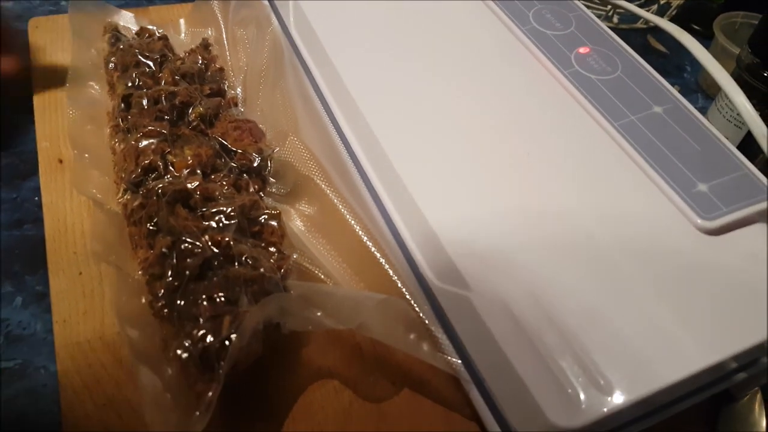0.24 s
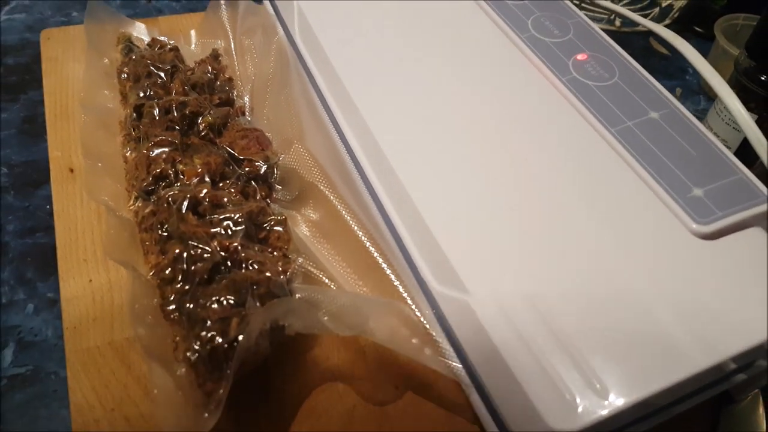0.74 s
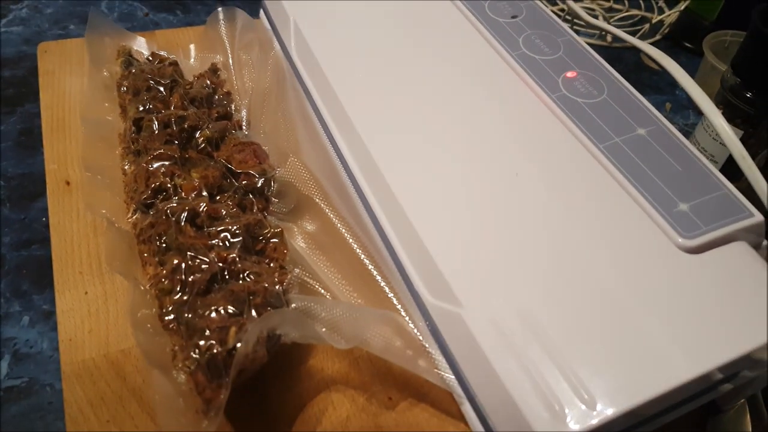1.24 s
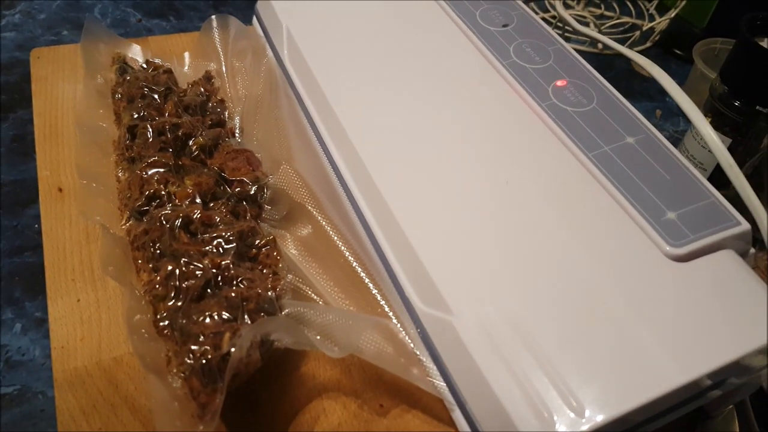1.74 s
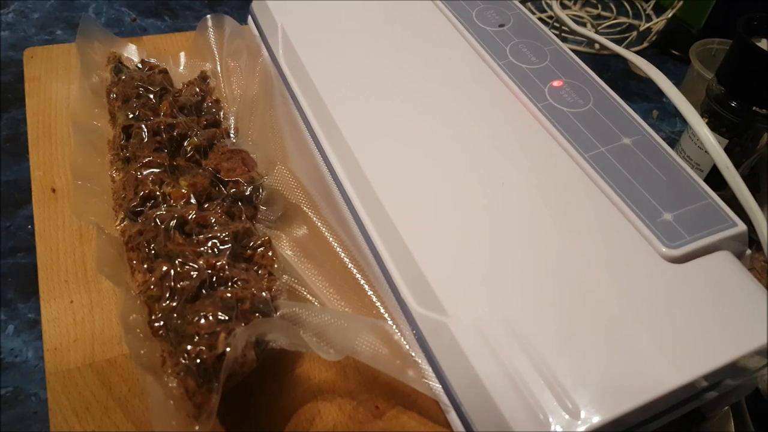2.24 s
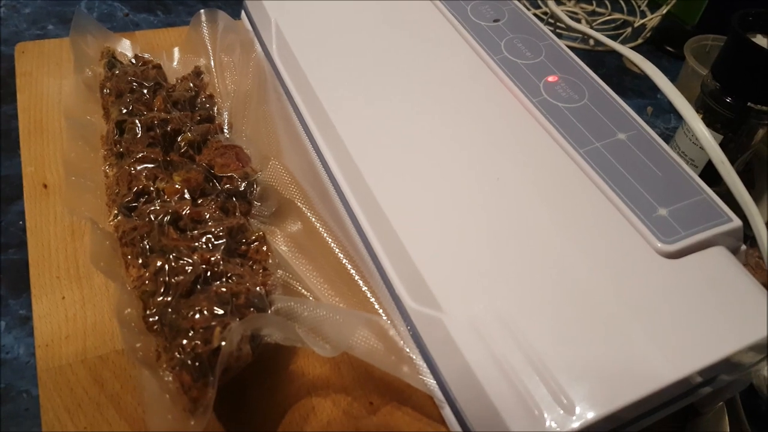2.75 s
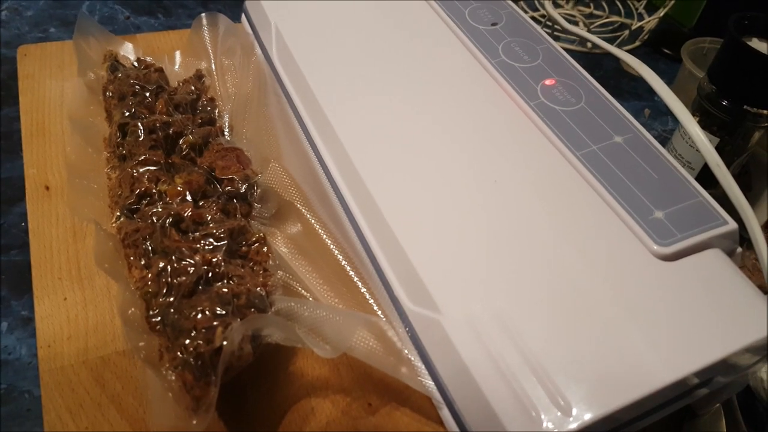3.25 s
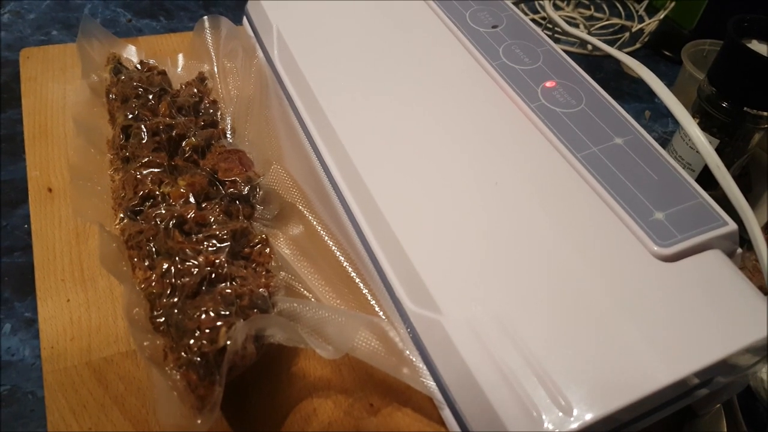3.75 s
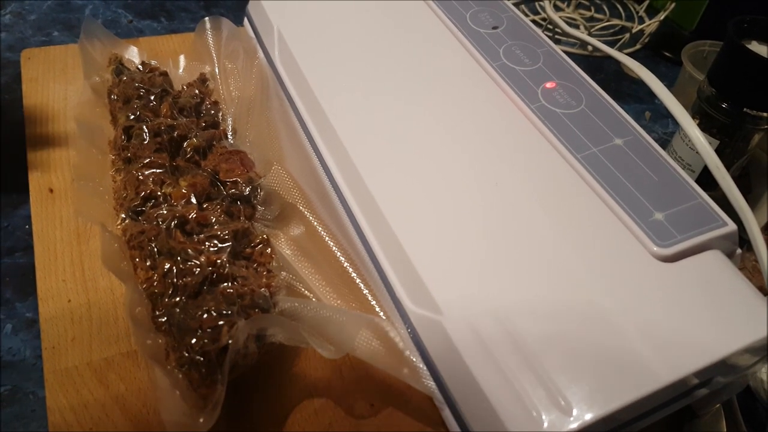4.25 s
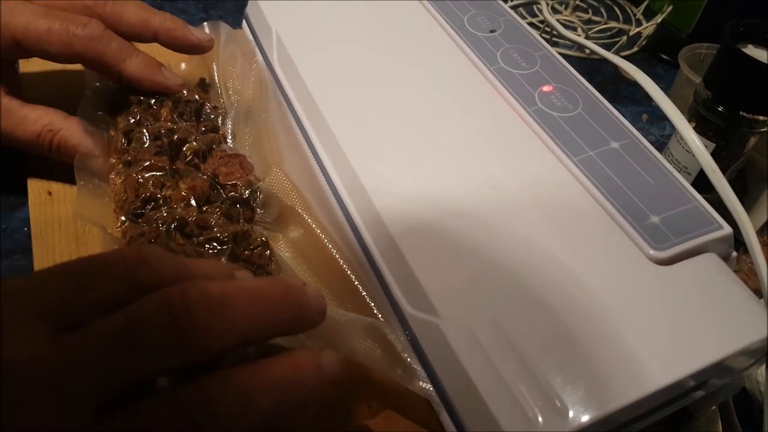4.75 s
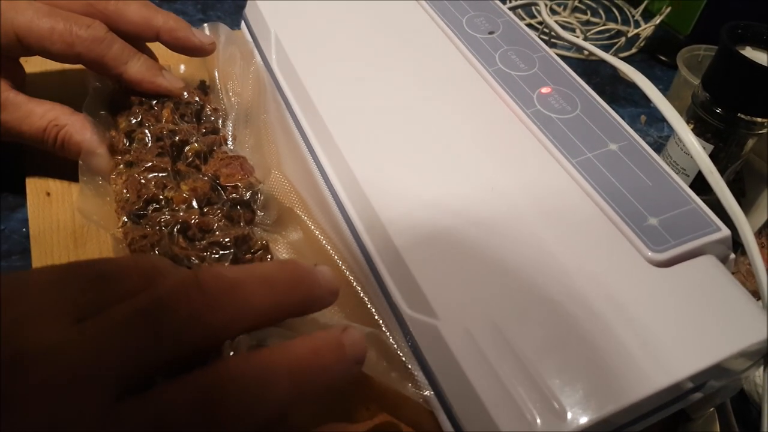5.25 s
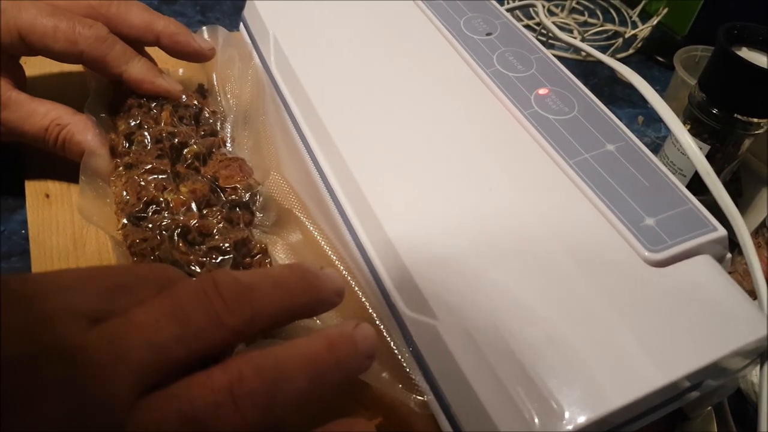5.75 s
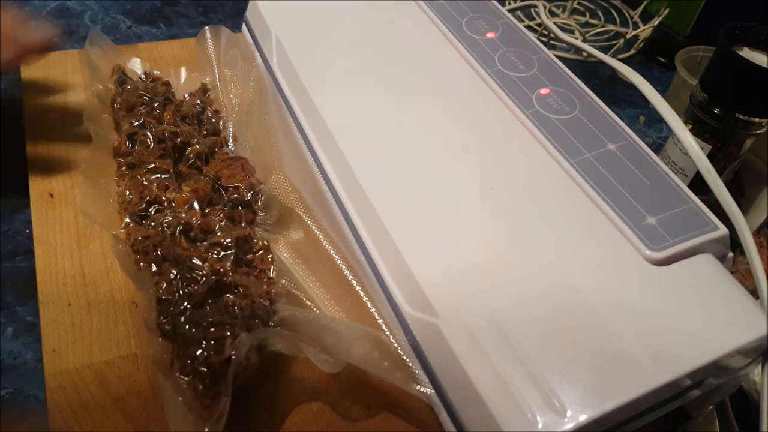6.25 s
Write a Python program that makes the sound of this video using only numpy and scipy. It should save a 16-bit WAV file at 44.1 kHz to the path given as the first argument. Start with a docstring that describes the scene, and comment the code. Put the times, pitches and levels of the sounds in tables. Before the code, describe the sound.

Close kitchen vacuum sealer pump buzzes hard and steadily, with hissing air, while a tightening plastic bag crackles, snaps and pops.

```python
"""A small piston pump in a kitchen vacuum sealer, close to two microphones, draws the air from a bag of food.
It turns about 42 times a second, slightly faster as the air thins; five blows a turn ring its casing.
A puff of hiss leaves the outlet each turn, over low crank tones and a steady rush of noise.
Ticks, snaps and pops are short noise bursts of the tightening film and pushes of its buckling creases.
Short reflections from the counter widen the pump; a small room gives the bag a brief tail."""
import sys
import numpy as np
from scipy import signal
from scipy.fft import rfft, irfft, next_fast_len
from scipy.io import wavfile
from scipy.ndimage import uniform_filter1d

SR = 44100
rng = np.random.default_rng(int(sys.argv[2]) if len(sys.argv) > 2 else 0)


def store_pcm(level_fs):
    """Save levels as 16-bit WAV."""
    pcm = np.round(np.clip(level_fs, -1, 1) * 32767).astype(np.int16)
    wavfile.write(sys.argv[1], SR, np.atleast_2d(pcm).T)


N = 286209
T = np.arange(N) / SR

# Speed of the pump shaft: time_s, turns_per_s
SHAFT_SPEED = [(0.0, 41.418), (0.5, 41.285), (1.1, 41.406), (1.5, 41.176), (2.0, 41.286), (2.5, 41.663),
               (3.4, 42.079), (4.2, 42.219), (5.0, 42.49), (6.0, 42.873), (6.49, 42.837)]
# Five blows, one row each: intake gulp, piston thump, valve opening, valve rebound, valve closing.
# Columns: open_place_turns, full_vacuum_place_turns, shift_power (exponent on vacuum),
# open_level_db, full_vacuum_level_db, halfway_extra_db, force_power (exponent on vacuum)
PUMP_BLOWS = [(0.007, -0.051, 0.96, 1.7, -10.3, 6.0, 0.74), (0.189, 0.172, 0.7, 20.9, 21.5, 0.7, 0.74),
              (0.211, 0.146, 0.91, -5.1, -0.2, -14.0, 0.86), (0.266, 0.256, 0.48, -4.4, -0.4, 11.3, 0.94),
              (0.331, 0.291, 0.63, 1.3, -1.0, -0.2, 0.41)]
# Colour of each blow before the casing: frequency_hz, gulp_db, thump_db, opening_db, rebound_db, closing_db
BLOW_COLOUR = [(40.0, -68.0, -64.0, -58.0, -65.0, -68.0), (150.0, -41.0, 1.0, -20.0, -23.0, -48.0),
               (280.0, -36.0, -32.0, 5.0, -15.0, 3.0), (450.0, -2.0, -11.0, -2.0, 0.0, 4.0),
               (650.0, -1.0, -22.0, -2.0, -13.0, -19.0), (950.0, -9.0, -15.0, -8.0, -6.0, 6.0),
               (1400.0, -16.0, -42.0, -9.0, -12.0, -12.0), (2000.0, -18.0, -22.0, 1.0, -2.0, -25.0),
               (2700.0, -32.0, -36.0, -26.0, -33.0, -37.0), (4000.0, -40.0, -58.0, -42.0, -42.0, -42.0),
               (9000.0, -66.0, -80.0, -64.0, -64.0, -66.0)]
# Resonances of casing and pump chamber: pitch_hz, width_hz, open_air_boost_db, full_vacuum_boost_db
CASING_RESONANCES = [(190, 15, 19.8, 18), (337.0, 14.0, 18.3, 14.1), (410.0, 14.0, 3.0, 8.8),
                     (457.0, 14.0, 14.0, 7.4), (497.0, 14.0, 10.5, 6.9), (565.0, 44.0, 0.3, 21.6),
                     (669.0, 16.0, 8.2, 12.7), (720.0, 20.0, 12.0, 17.9), (758.0, 14.0, 17.1, 5.8),
                     (884.0, 27.0, 8.6, 1.7), (1044.0, 14.0, 10.7, 1.8), (1141.0, 16.0, 11.8, 10.3),
                     (1265.0, 41.0, 9.3, 14.4), (1356.0, 29.0, 9.5, 15.0), (1440.0, 35.0, 16.4, 8.1),
                     (1588.0, 51.0, 7.0, 2.9), (1729.0, 53.0, 4.1, 7.5), (1953, 32, 9.7, 11),
                     (2101, 26, 8, 7.5), (2269, 80, 8.5, 10), (3050, 160, 4, 7)]
# Bands that swell into a whine (above 0 dB) or hollow out (below) as the pressure falls:
# height_s, half_length_s, pitch_hz, glide_hz_per_s, width_hz, boost_db
PRESSURE_SWELLS = [(0.19, 0.67, 253.0, -4.0, 46.0, -9.4), (0.92, 0.41, 1356.0, 207.0, 97.0, 10.7),
                   (1.13, 0.63, 587.0, 35.0, 47.0, 9.6), (1.14, 0.8, 1109.0, 3.0, 20.0, 10.5),
                   (1.63, 0.49, 454.0, -2.0, 24.0, -11.9), (1.66, 0.47, 1597.0, 4.0, 100.0, 5.4),
                   (2.11, 0.35, 2093.0, -29.0, 57.0, 7.4), (2.18, 0.55, 782.0, 43.0, 22.0, 7.0),
                   (2.32, 0.57, 2482.0, 4.0, 136.0, 9.4), (2.69, 0.37, 1663.0, -5.0, 235.0, -13.1),
                   (2.7, 0.51, 1341.0, -97.0, 70.0, 6.7), (3.52, 0.72, 1163.0, -43.0, 101.0, -14.6),
                   (4.26, 0.51, 1452.0, 6.0, 96.0, -7.6), (5.88, 0.94, 604.0, -9.0, 44.0, -14.2)]
# Shaking of the unbalanced crank: multiple_of_shaft_speed, start_level_db, end_level_db (peak, before the pump's gain)
CRANK_SHAKE = [(1.0, -60.3, -55.1), (2.0, -47.1, -36.9), (3.0, -26.5, -46.6), (4.0, -33.4, -28.4),
               (6.0, -49.4, -38.0), (7.0, -47.5, -31.2)]
# Level of the air jet at the outlet: time_s, level_db (rms)
OUTLET_LEVEL = [(0, -38.5), (2, -38), (3.5, -39.5), (4.5, -38.5), (6.49, -38)]
# Relative colour of the air jet: frequency_hz, density_db (per Hz)
OUTLET_COLOUR = [(300, -17), (1200, -4.5), (2200, 0.5), (3000, -2.5), (3700, -14), (4400, -12.5),
                 (7000, -17.5), (16000, -20)]
# Pump sound arriving from the sides: frequency_hz, level_db (against the direct sound)
SIDE_COLOUR = [(125, -21), (250, -15), (500, -11), (1000, -3.5), (2000, -3), (4000, -2)]
# Pump at the two microphones: frequency_hz, left_minus_right_db, left_lead_rad
STEREO_LEAN = [(146, -1.8, 0.18), (303, 0.3, 0.15), (566, .2, 0.57), (955, 0, 0.19), (4100, -.5, 0.46)]
# Relative colour of the steady motor and room noise: frequency_hz, density_db (per Hz)
RUSH_COLOUR = [(20, -3), (45, -3), (100, 7), (180, 6), (270, 3), (600, 6), (1000, -3), (2000, 2),
               (3500, -11), (7000, -33), (16000, -31)]
# Relative colour of the film: frequency_hz, density_db (per Hz)
FILM_COLOUR = [(200, -48), (600, 7.5), (1200, 7.5), (2500, 4), (4000, 6), (6500, 1), (8700, 3),
               (11000, 0.5), (16000, -2)]
# Flurries of crackle as a fold shifts, the last under pressing hands: peak_s, level_db (at the peak), fade_db_per_s
FOLD_FLURRIES = [(1.3, -34.5, 78), (2.03, -35.5, 58), (2.74, -36, 35), (3.28, -39.5, 18),
                 (4.85, -36.5, 9.5)]
# Buckling creases: start_s, push_db (peak, before the rattle and the air pocket)
CREASE_POPS = [(0.019, -13), (0.047, -12.5), (0.729, -8.5), (1.266, -11), (1.29, -10.5), (1.348, -18),
               (2.431, -11.5), (2.739, -4.5), (2.761, -13), (4.898, -14)]
# Relative colour of a buckling crease: frequency_hz, density_db (per Hz)
CREASE_COLOUR = [(100, -12), (450, -6), (850, 3), (1300, 0), (2700, -1.5), (4500, -11.5), (9000, -23.5),
                 (16000, -15.5)]
# Sharp snaps of the film: cue_s, relative_level_db, lower_treble_db, upper_treble_db, left_minus_right_db
FILM_SNAPS = [(0.043, -10.5, -18, -12.5, 6), (0.34, -18.5, -28, -3, 5), (0.5217, -10.5, -10, -13, 4),
              (0.5886, -11, -14, -10, 2), (0.822, -8.5, -13.5, -16, 4), (0.9099, -12, -8.5, -10, 3),
              (1.0155, -15, -8, -9, 5), (1.0812, -13, -13, -10, 7.5), (1.266, -14.5, -11.5, -17, -6),
              (1.291, -14, -13.5, -16, 8), (1.348, -7.5, -13.5, -13, 2), (1.369, -12.5, -12, -12, 3),
              (1.468, -14, -11.5, -5.5, 7), (1.5716, -13, -9, -9.5, -1), (1.922, -12.5, -14.5, -12, 1),
              (2.1783, -8, -16, -9, 0), (2.6922, -8, -13, -14.5, 7), (2.7272, -20, -17, -9, 2),
              (2.7598, -13, -9.5, -15, 4), (2.834, -6.5, -14.5, -18, 4), (2.92, -9, -25, -10.5, 6),
              (3.1027, -6, -19, -13.5, 5), (3.2814, -19.5, -9, -31, 17), (3.35, -10.5, -11, -11, 2),
              (4.1858, -20, -8, -9, 2), (4.5143, -18, -15.5, -12, 0.5), (4.559, -15.5, -10.5, -13, 4),
              (4.6309, -16.5, -18, -15, 3), (4.7548, -7, -13.5, -16, -1), (4.86, -11.5, -15.5, -8, 0),
              (4.8868, -14.5, -14, -13, 3.0), (5.024, -17.5, -6.5, -9, 0), (5.204, -20.5, -9.5, -9, 1.5),
              (5.3593, -15, -11, -15.5, 1), (5.658, -13.5, -12.5, -15.5, -1), (5.7613, -16, -18, -9, 3.0),
              (6.321, -14, -19, -11.5, -4), (6.4276, -25, -9, -1.5, 1)]
# Gain of the whole scene, which dips briefly; end values hold outside: time_s, gain_db
LEVEL_DIP = [(3.32, 2), (3.36, -1), (3.62, -1), (3.78, 2.5)]

# Vacuum builds slowly while the bag collapses, then fast, then levels off: time to 63 % (s), steepness
VACUUM_S, VACUUM_STEEPNESS = 3.35, 3.7
# Valves flap loosely in free air and seat firmly under vacuum: scatter of a blow's timing (s)
JITTER_OPEN_S, JITTER_FULL_S = .000022, .000008
# How far the crank's shaking lags the intake (turns)
CRANK_LAG_TURNS = .0144
# Pump-chamber drone while air flows freely: multiple of shaft speed, start level (dB, before pump gain), fade (dB/s)
DRONE_MULTIPLE, DRONE_DB, DRONE_FADE_DB_PER_S = 8, -32, 4.4
# Share of the outlet's flutter power that repeats from turn to turn (0-1)
FLUTTER_REPEAT = .7
# Outlet valve buzz: pitch and width (Hz), level at full vacuum (dB), place and half length (turns)
BUZZ_HZ, BUZZ_WIDTH_HZ, BUZZ_DB, BUZZ_PLACE, BUZZ_LENGTH = 3050, 750, -49.5, .055, .065
# Film crackle: start level (dB), fade as the bag tightens (dB/s), rise of each flurry (dB/s)
CRACKLE_DB, CRACKLE_FADE_DB_PER_S, FLURRY_RISE_DB_PER_S = -32.5, 3, 75
# Largest random tick, in multiples of the spread of tick levels
LARGEST_TICK = 4.8
# Upper band edge of the recorder (Hz)
EDGE_HZ = 15950


def amp(db):
    """Decibels to gain."""
    return 10 ** (np.asarray(db) / 20)


def unit(x):
    """Scales to rms 1."""
    return x / np.sqrt(np.mean(x ** 2) + 1e-20)


def curve(rows, s, column=1):
    """One column of a table, joined by straight lines in time."""
    rows = np.asarray(rows)
    return np.interp(s, rows[:, 0], rows[:, column])


def read(rows, hz, column=1):
    """One column of a table, joined by straight lines in log frequency."""
    rows = np.asarray(rows)
    return np.interp(np.log(hz + 1), np.log(rows[:, 0] + 1), rows[:, column])


def causal(rows, column=1, size=4096):
    """The most compact causal (minimum-phase) impulse response with this spectrum."""
    hz = abs(np.fft.fftfreq(size, 1 / SR))
    log_gain = np.log(amp(read(rows, hz, column)))
    spectrum = np.exp(np.conj(signal.hilbert(log_gain)))
    return np.fft.ifft(spectrum).real[:size // 2]


def convolve(x, response):
    """Convolves each channel and cuts to the length of the scene."""
    return signal.oaconvolve(np.atleast_2d(x), np.atleast_2d(response), axes=1)[:, :N]


def add(mix, s, sound):
    """Mixes a stereo sound in at time s."""
    start = max(round(s * SR), 0)
    part = mix[:, start:][:, :sound.shape[1]]
    part += sound[:, :part.shape[1]]


def tail(t60, gap_s=0.0017):
    """Dense reflections of energy 1 after a short gap, different in each channel."""
    t = T[:SR // 3]
    echoes = rng.standard_normal((2, len(t))) * amp(-60 * t / t60) * (t > gap_s)
    return echoes / np.linalg.norm(echoes, axis=1, keepdims=True)


def lift(x, hz, width, db):
    """A fixed or moving resonance lifts a narrow band and rings on; negative dB hollows the band out."""
    carrier = np.exp(2j * np.pi * np.cumsum(hz * np.ones(N)) / SR)
    decay = np.exp(-np.pi * width / SR)
    # Shift the band to 0 Hz, smooth it there, and shift it back.
    baseband = signal.lfilter([1 - decay], [1, -decay], x / carrier + 1e-18)
    band = 2 * (carrier * baseband).real
    return x + (amp(db) - 1) * band


def window(turns, place, length):
    """A smooth gate that peaks once a turn, at this place."""
    distance = (turns - place + .5) % 1 - .5
    return np.exp(-(distance / length) ** 2)


def vacuum(s):
    """How far the air is drawn out at time s, 0-1."""
    return 1 - np.exp(-(s / VACUUM_S) ** VACUUM_STEEPNESS)


def casing(x):
    """Casing and chamber ring after each blow; their balance shifts as the air thins, and whines come and go."""
    load = vacuum(T)
    for hz, width, open_db, full_db in CASING_RESONANCES:
        x = lift(x, hz, width, open_db + (full_db - open_db) * load)
    for s, length, hz, glide, width, db in PRESSURE_SWELLS:
        swell_db = db * np.exp(-((T - s) / length) ** 2)
        x = lift(x, hz + glide * (T - s), width, swell_db)
    return x


def blows(turns, uneven_db=.15):
    """Five blows a turn come earlier as the vacuum builds, with random scatter in timing and force."""
    beats, out = np.arange(int(turns[-1]) + 1), np.zeros(N)
    load = vacuum(np.interp(beats, turns, T))
    jitter_s = JITTER_OPEN_S + (JITTER_FULL_S - JITTER_OPEN_S) * load
    for k, row in enumerate(PUMP_BLOWS):
        open_place, full_place, shift_power, open_db, full_db, halfway_db, force_power = row
        late, strong = rng.standard_normal((len(beats), 2)).T
        place = open_place + (full_place - open_place) * load ** shift_power
        strain = load ** force_power
        force_db = open_db + (full_db - open_db) * strain
        force_db = force_db + halfway_db * (1 - (2 * strain - 1) ** 2)
        at = (np.interp(beats + place, turns, T) + jitter_s * late) * SR
        size = amp(force_db + uneven_db * strong) * (at > 2) * (at < N - 10)
        # Split each pulse over two samples to keep its exact time.
        whole, pulses = np.clip(at.astype(int), 0, N - 2), np.zeros(N)
        pulses[whole] = size * (1 - at % 1)
        pulses[whole + 1] = size * (at % 1)
        out += convolve(pulses, causal(BLOW_COLOUR, k + 1))[0]
    return casing(out)


def shake(turns, mains_db=-46):
    """Low crank tones just behind the intake, a drone that fades with the airflow, and a faint mains hum."""
    angle = 2 * np.pi * (turns - CRANK_LAG_TURNS)
    crank = np.zeros(N)
    for multiple, start_db, end_db in CRANK_SHAKE:
        level_db = np.interp(T, [0, T[-1]], [start_db, end_db])
        crank += amp(level_db) * np.cos(round(multiple) * angle)
    drone = -amp(DRONE_DB - DRONE_FADE_DB_PER_S * T) * np.cos(DRONE_MULTIPLE * angle)
    mains = np.sin(2 * np.pi * 100 * T)
    return crank + drone + amp(mains_db) * mains


def jet(turns, place=0.044, length=0.12, leak=0.39, size=1024):
    """Air hisses out in a puff each turn over a steady leak, its flutter partly repeating; a valve buzz grows."""
    shapes = rng.standard_normal((2, size))
    flutter = np.array([unit(np.interp(turns % 1 * size, np.arange(size), shape)) for shape in shapes])
    fresh = rng.standard_normal((2, N))
    air = np.sqrt(FLUTTER_REPEAT) * flutter + np.sqrt(1 - FLUTTER_REPEAT) * fresh
    hiss = convolve(air * (leak + window(turns, place, length)), causal(OUTLET_COLOUR))
    edges = [BUZZ_HZ - BUZZ_WIDTH_HZ / 2, BUZZ_HZ + BUZZ_WIDTH_HZ / 2]
    valve = signal.butter(2, edges, "band", fs=SR, output="sos")
    buzz = signal.sosfilt(valve, air * window(turns, BUZZ_PLACE, BUZZ_LENGTH))
    buzz_gain = amp(BUZZ_DB) * np.sqrt(vacuum(T))
    return amp(curve(OUTLET_LEVEL, T)) * unit(hiss) + buzz_gain * unit(buzz)


def pump(db=-0.19, side_t60=0.023):
    """The close pump, widened by reflections from the counter and nearby things, plus its outlet jet."""
    turns = np.cumsum(curve(SHAFT_SPEED, T)) / SR
    direct = amp(db) * (blows(turns) + shake(turns))
    side = convolve(convolve(direct, causal(SIDE_COLOUR)), tail(side_t60)[0])[0]
    size = next_fast_len(N + SR // 2)
    hz = np.fft.rfftfreq(size, 1 / SR)
    # Half of the level and phase difference goes to each microphone.
    lean = amp(read(STEREO_LEAN, hz) / 2) * np.exp(.5j * read(STEREO_LEAN, hz, column=2))
    pair = rfft([direct + side, direct - side], size) * [lean, 1 / lean]
    return irfft(pair, size)[:, :N] + jet(turns)


def rush(db=-39, mono_below_hz=900):
    """Steady noise of motor and room; towards the bass the two channels become alike."""
    mid, side = convolve(rng.standard_normal((2, N)), causal(RUSH_COLOUR))
    side = signal.sosfilt(signal.butter(1, mono_below_hz, "high", fs=SR, output="sos"), side)
    return amp(db) * unit(np.array([mid + side, mid - side]))


def tick(decay_s, pan_db=0, shared=0.041):
    """A facet of film flips over: a noise burst decaying within a millisecond, partly alike in both channels."""
    t, shared = T[:256], np.clip(shared, 0, 1)
    common = rng.standard_normal(len(t))
    separate = rng.standard_normal((2, len(t)))
    noise = np.sqrt(shared) * common + np.sqrt(1 - shared) * separate
    burst = noise * np.exp(-t / decay_s)
    return burst / np.linalg.norm(burst.mean(0)) * amp([[pan_db / 2], [-pan_db / 2]])


def creasing():
    """How hard the film crackles: a steady fade, plus flurries that swell quickly and die away."""
    power = amp(CRACKLE_DB - CRACKLE_FADE_DB_PER_S * T) ** 2
    for peak_s, db, fade in FOLD_FLURRIES:
        drop_db = np.maximum(FLURRY_RISE_DB_PER_S * (peak_s - T), fade * (T - peak_s))
        power = power + amp(db - drop_db) ** 2
    return np.sqrt(power)


def crackle(per_s=1200, spread_db=4.5, decay_s=0.00037, pan_db=2.5, clump_db=2, clump_s=0.011, count=24):
    """Many facets tick at random, most of them faintly, in clumps as a whole fold shifts."""
    level_db = spread_db * np.minimum(rng.exponential(1, N), LARGEST_TICK)
    size = amp(level_db) * (rng.random(N) < per_s / SR)
    clumps = unit(uniform_filter1d(rng.standard_normal(N), int(clump_s * SR) + 1))
    size *= amp(clump_db * clumps)
    facet = rng.integers(0, count, N)
    ticks = sum(convolve(size * (facet == k), tick(decay_s, pan_db)) for k in range(count))
    return creasing() * unit(convolve(ticks, causal(FILM_COLOUR)))


def pops(db=0, ring_db=2.0, ring_t60=0.049, rebound_s=0.00061, rebound=0.13,
         pocket_hz=1000, pocket_width_hz=300, pocket_db=2):
    """A crease gives way with a sharp push and springs back; the bag rattles and an air pocket rings briefly."""
    out, push = np.zeros((2, N)), causal(CREASE_COLOUR)
    push = push / abs(push).max()
    for s, push_db in CREASE_POPS:
        blow = amp(ring_db) * tail(ring_t60)
        blow[:, 0] += 1
        blow[:, round(rebound_s * SR)] -= rebound
        add(out, s, amp(push_db + db) * convolve(blow, push))
    return lift(out, pocket_hz, pocket_width_hz, pocket_db)


def snaps(db=17, decay_s=0.00092, delay_s=0.001147, after_db=-9, after_t60=0.012):
    """The sharpest flips of the film, each with its own brightness; neighbouring facets follow at once."""
    out = np.zeros((2, N))
    for s, level_db, lower_db, upper_db, pan_db in FILM_SNAPS:
        tilt = causal([(5500, lower_db), (11000, upper_db)], size=256)
        flips = amp(after_db) * tail(after_t60)
        flips[:, 0] += 1
        snap = convolve(convolve(flips, tick(decay_s, pan_db)), tilt)
        add(out, s + delay_s, amp(level_db + db) * snap)
    return convolve(out, causal(FILM_COLOUR))


def scene(room_db=-5, room_t60=0.08):
    """Pump and bag on the counter; the room gives the bag's clicks a short tail, and the level dips briefly."""
    machine = pump() + rush()
    bag = crackle() + pops() + snaps()
    room = amp(room_db) * convolve(bag, tail(room_t60))
    return (machine + bag + room) * amp(curve(LEVEL_DIP, T))


def record(dry):
    """The recorder's band limit: a steep low-pass filter."""
    low_pass = signal.firwin(511, EDGE_HZ, window=("kaiser", 9), fs=SR)
    return signal.oaconvolve(dry, low_pass[None], "same", axes=1)


dry = scene()
out = record(dry)
store_pcm(out)
```